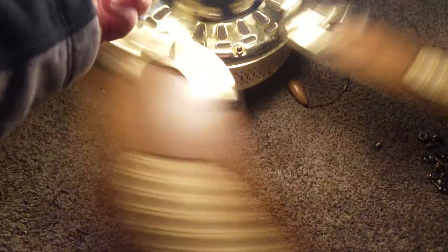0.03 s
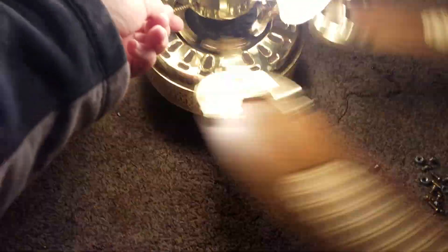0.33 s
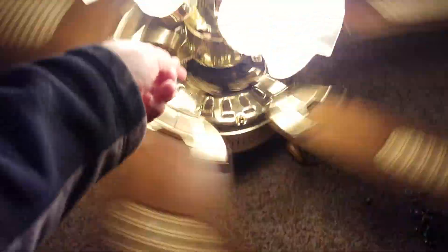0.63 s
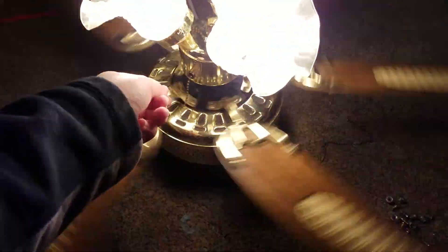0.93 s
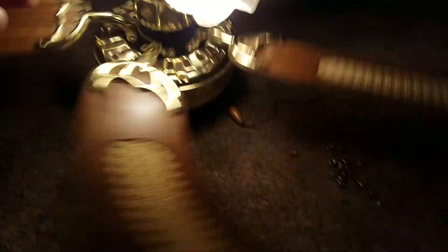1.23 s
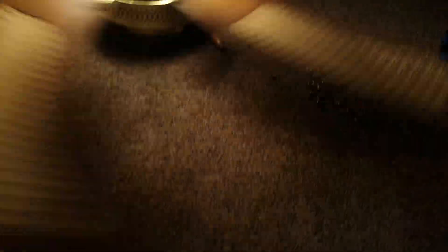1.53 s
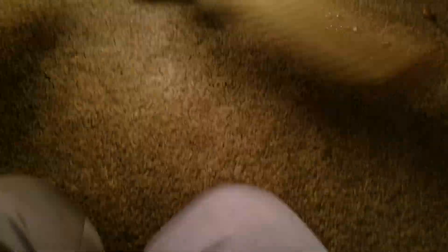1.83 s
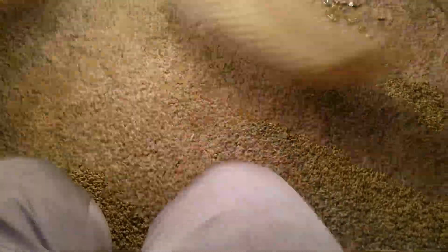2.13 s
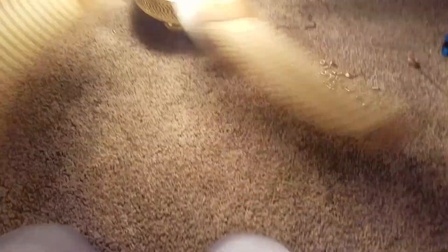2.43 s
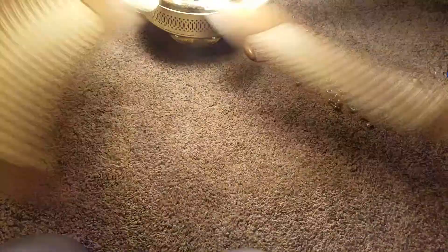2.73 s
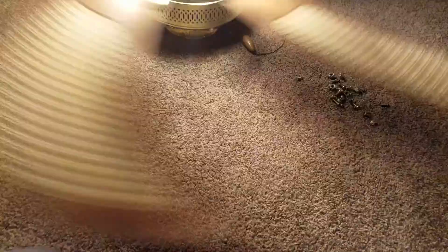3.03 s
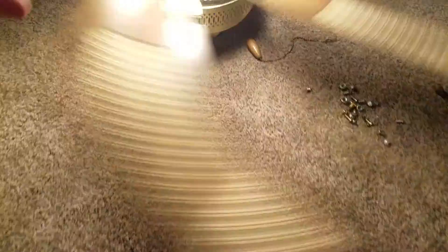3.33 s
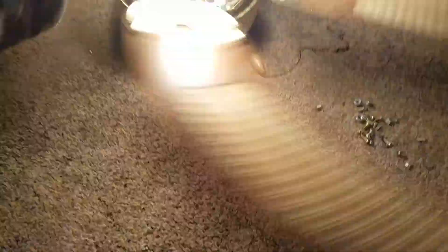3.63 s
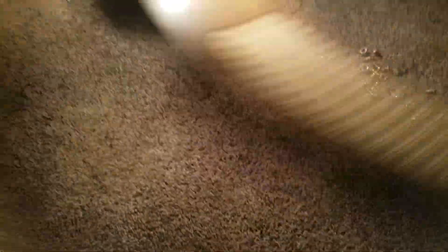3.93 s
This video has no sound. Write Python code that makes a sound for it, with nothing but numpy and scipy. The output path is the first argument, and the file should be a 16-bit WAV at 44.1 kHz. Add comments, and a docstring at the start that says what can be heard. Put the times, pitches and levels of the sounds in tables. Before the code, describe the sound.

Sharp, irregular metallic clicks and rattles from a turning ceiling fan over a faint hum.

```python
"""A ceiling fan just above a carpet in a small, well damped room, close to a stereo microphone. From the start
it gathers speed: the motor hums, its whine climbs and the blades stir the air. From about half a second small
loose metal parts strike the turning fan in sharp, bright, often doubled clicks, with fainter, duller taps
further off. Past two seconds the fan's housing takes two knocks; in the last second a soft rustle swells and
fades, and a loose fitting rings."""
import sys
import numpy as np
from scipy.fft import rfft, irfft, next_fast_len
from scipy.io import wavfile
from scipy.ndimage import map_coordinates

SR = 44100
rng = np.random.default_rng(int(sys.argv[2]) if len(sys.argv) > 2 else 0)


def generate_wav(sig):
    """Save sig (samples, or channels by samples) to the path in sys.argv[1] as 16-bit PCM at SR."""
    pcm = np.round(np.clip(np.atleast_2d(sig).T, -1, 1) * 32767).astype(np.int16)
    wavfile.write(sys.argv[1], SR, pcm)


N = 4 * SR

# How alike the two microphones hear air and impacts. Each row: frequency in Hz, left-right correlation.
AIR_LIKENESS = [(30, 0.88), (120, 0.67), (200, 0.98), (330, 0.8), (700, 0.4), (2000, 0.1), (8000, 0.042)]
IMPACT_LIKENESS = [(800, 0.5), (1500, 0.24), (3000, 0.056), (7000, -0.034), (15000, 0.027)]


def amp(db):
    """Decibels to gain."""
    return 10 ** (np.asarray(db) / 20)


def along(points, hz):
    """Read (Hz, value) points on a log frequency axis."""
    f, v = np.transpose(points)
    return np.interp(np.log(hz + 1), np.log(f + 1), v)


def wander(position, size=1024):
    """A smooth random curve with one knot per unit of position."""
    return map_coordinates(rng.standard_normal(size), [position], mode="mirror")


def noise(n, gain, likeness):
    """Stereo noise of rms 1 with a gain per frequency and a left-right likeness."""
    hz = np.fft.rfftfreq(n, 1 / SR)
    angle = np.arccos(np.clip(along(likeness, hz), -1, 1)) / 2
    spectrum = rfft(rng.standard_normal((2, n))) * gain(hz)
    mid, side = irfft(spectrum * [np.cos(angle), np.sin(angle)], n)
    stereo = np.array([mid + side, mid - side])
    return stereo / np.sqrt(np.mean(stereo ** 2) + 1e-20)


def air_noise(colour):
    """Steady noise of the given colour, nearly mono in the bass and wide in the treble."""
    return noise(N, lambda hz: amp(along(colour, hz)), AIR_LIKENESS)


def strike(t, rise, t60, hold=0):
    """A quick rise and an exponential decay that starts after the hold; times in seconds."""
    return (1 - np.exp(-t / rise)) * np.exp(-np.log(1000) * np.maximum(t - hold, 0) / t60)


def ring(t, modes, scatter_db):
    """Damped modes, blurred by reflections, reaching each microphone with their own phase."""
    mic_phase = 1.25 * np.array([[-.5], [.5]])  # radians
    sound = 0
    for hz, db, t60 in modes:
        envelope = amp(db + scatter_db * rng.normal()) * strike(t, rise=0.0019, t60=t60)
        phase = 2 * np.pi * (hz * t + rng.random())
        blur = 0.41 * wander(250 * t, size=128)
        sound += envelope * np.sin(phase + blur + mic_phase)
    return sound


def spot(hz):
    """Every struck spot has its own broad and fine resonances: a random curve in dB."""
    return 3.5 * (wander(hz / 330) + wander(hz / 70))


def add(out, start, sound):
    """Mix a sound in at a start time in seconds."""
    part = out[:, round(start * SR):][:, :sound.shape[-1]]
    part += sound[..., :part.shape[1]]


def air(t):
    """The rush of the blades grows with the speed, with a few low puffs of draught, over a faint hiss."""
    # Air stirred by the blades. Each row: time in seconds, relative level in dB.
    rush_levels = [(0.0, -64.5), (0.88, -62.5), (1.48, -58.5), (1.8, -60), (2.09, -60.5), (2.24, -59.5),
                   (3.34, -59), (4.0, -58)]
    # Puffs of draught. Each row: centre in seconds, width in seconds, level in dB.
    puffs = [(2.0, 0.094, -60.5), (3.67, 0.14, -72), (3.92, 0.11, -60.5)]
    # Spectra of the three noises. Each row: frequency in Hz, relative level in dB.
    rush_colour = [(15, -43), (28, -13), (60, -12), (90, -10.5), (170, -11), (250, -7), (300, -5),
                   (370, -2), (450, -8.5), (700, -12), (1000, -19.5), (1400, -19.5), (2500, -23),
                   (5000, -33.5), (8000, -36.5), (10000, -36.5), (13000, -32.5), (16000, -48)]
    puff_colour = [(25, -35), (70, 5.5), (180, 8.5), (320, 3), (700, 3), (2000, -77), (8000, -70)]
    hiss_colour = [(100, -1), (2000, -12), (6000, -4.5), (10000, -13), (13000, 0), (16000, -2)]
    rush_db = np.interp(t, *np.transpose(rush_levels)) - 0.5 + 1.5 * wander(12 * t)
    rush = amp(rush_db) * air_noise(rush_colour)
    swell = sum(amp(db) * np.exp(-.5 * ((t - centre) / width) ** 2) for centre, width, db in puffs)
    return rush + swell * air_noise(puff_colour) + amp(-73) * air_noise(hiss_colour)


def rustle(t):
    """A soft rustling hiss comes and goes near the end."""
    # Its swell. Each row: time in seconds, level in dB.
    levels = [(3.22, -90), (3.33, -65.5), (3.552, -58), (3.76, -59.5), (3.9, -66), (4, -86)]
    # Its spectrum. Each row: frequency in Hz, relative level in dB.
    colour = [(500, -2), (1500, 7.5), (3000, -8.5), (5000, 1), (6200, 0), (7200, 6), (8000, 6), (9000, -19),
              (11000, -7), (14000, -3), (16000, -8)]
    return amp(np.interp(t, *np.transpose(levels))) * air_noise(colour)


def motor(t):
    """The motor's whine climbs with its speed, over a slightly wavering hum."""
    # The whine. Each row: time in seconds, pitch in Hz, rms level in dB.
    whine_track = [(0, 322, -88), (0.499, 341, -76), (1.102, 357, -74.5), (1.302, 362, -61.5),
                   (1.649, 371, -62), (1.95, 376.6, -65.5), (2.15, 381.3, -58), (2.35, 384, -71.5),
                   (2.551, 386.3, -53), (2.781, 391.6, -70.5), (2.982, 390.2, -57), (3.15, 395, -72.5),
                   (3.38, 395.5, -61.5), (3.549, 399, -71.5), (4, 403.4, -64)]
    # Partials of the hum. Each row: frequency in Hz, rms level in dB.
    partials = [(120, -78.5), (240, -102), (360, -72.5), (476, -78), (596, -84.5)]
    times, hz, db = np.transpose(whine_track)
    phase = 2 * np.pi * np.cumsum(np.interp(t, times, hz)) / SR
    whine = amp(np.interp(t, times, db) + wander(14 * t)) * np.sin(phase)
    hum = sum(amp(level + 2 * wander(4 * t)) * np.sin(2 * np.pi * f * t + 0.27 * wander(5 * t))
              for f, level in partials)
    return np.sqrt(2) * (whine + hum)


def taps(t):
    """Dull taps further from the microphone, each a short burst of resonant noise."""
    # Each row: start in seconds, level in dB.
    hits = [(.989, -47.5), (1.107, -50.5), (1.229, -44.5), (1.722, -55), (2.23, -51), (2.51, -58),
            (2.605, -50.5), (2.626, -50), (2.71, -57.5), (2.991, -53.5), (3.276, -55)]
    # A tap's average spectrum. Each row: frequency in Hz, relative level in dB.
    colour = [(700, -20), (1300, 4), (1900, -1), (2350, 14.5), (2900, -6), (3500, -19), (7000, -9.5),
              (10000, -39), (13000, -6), (16000, -6)]
    out = np.zeros((2, N))
    for start, db in hits:
        tap = noise(t.size, lambda hz: amp(along(colour, hz) + spot(hz)), IMPACT_LIKENESS)
        add(out, start, amp(db) * strike(t, rise=0.00067, t60=0.14) * tap)
    return out


def ringing_parts(t):
    """The knocked housing and a loose fitting ring on in their modes; small pings sound one mode each."""
    # Blows to each part. Each row: start in seconds, strength in dB.
    housing_hits = [(2.282, -37.5), (2.443, -50)]
    fitting_hits = [(3.870, -41)]
    # Their modes. Each row: frequency in Hz, relative level in dB, t60 in seconds.
    housing_knock_modes = [(1116, -8.5, 0.26), (1150, -17, 0.043), (1274, -9, 0.09), (1343, -3, 0.088),
                           (1780, 4, 0.019), (1840, -15, 0.04), (2010, -17, 0.068), (2174, -8, 0.081),
                           (2480, 6.5, 0.078)]
    fitting_modes = [(2380, -0.5, 0.067), (2450, 1, .08), (2920, -1, 0.092), (4070, -24, 0.053),
                     (5385, -7, .1), (6310, 2, 0.12), (7280, -6, 0.16), (11900, 3, 0.11)]
    # Each row: start in seconds, frequency in Hz, level in dB, t60 in seconds.
    pings = [(.5342, 7770, -41.5, 0.0086), (1.158, 526, -43.5, 0.022), (1.436, 8050, -31, 0.059),
             (2.567, 6604, -39.5, 0.067), (3.142, 4600, -36.5, 0.08)]
    out = np.zeros((2, N))
    for hits, modes in (housing_hits, housing_knock_modes), (fitting_hits, fitting_modes):
        for start, db in hits:
            add(out, start, amp(db) * ring(t, modes, scatter_db=2.5))
    for start, *mode in pings:
        add(out, start, ring(t, [mode], scatter_db=0))
    return out


def clicks(t):
    """Metal strikes the fan close up: dense, quickly dying resonances, housing ring and room tail."""
    # Each row: start in seconds, then relative levels in dB of body, middle, treble and room tail.
    hits = [(.44, -63.5, -67, -72, -3), (.852, -54.5, -56, -58.5, -0.5), (0.9525, -48, -40, -27.5, 5.5),
            (1.079, -49.5, -46, -41, 7), (1.19, -46, -33, -26, 0.5), (1.203, -50, -36.5, -27, 2.5),
            (1.214, -44.5, -54, -37, -7), (1.3816, -47.5, -37.5, -27.5, 3), (1.386, -43, -53, -22.5, -2),
            (1.437, -43.5, -37.5, -30, 2), (1.549, -49.5, -47.5, -33.5, -1),
            (1.5548, -48.5, -39.5, -30, -1), (1.649, -55.5, -46, -37.5, 8.5),
            (1.788, -55.5, -49, -40, -1.5), (1.8494, -45, -35, -27.5, -3.5),
            (1.8545, -50, -40.5, -23.5, 1.5), (1.8967, -48, -39, -23.5, 0.5),
            (2.0125, -47.5, -45, -31, -12), (2.014, -54, -41, -35, 3.5), (2.1985, -59, -42.5, -27, 2),
            (2.2105, -56, -44, -50, 0), (2.2818, -37, -34.5, -23, 5.5), (2.4428, -41.5, -34, -26.5, 5),
            (2.4993, -52, -43.5, -39, 6.5), (2.567, -52.5, -35.5, -32.5, 6), (2.922, -64, -49, -42, -9),
            (2.9283, -52, -39, -26.5, 0), (2.943, -59, -39.5, -34, 1), (2.957, -51.5, -51, -38.5, 4),
            (3.115, -42, -44, -36, -14), (3.1188, -49, -39, -28, 6), (3.143, -55.5, -53, -37, 6),
            (3.224, -58, -46, -40, 0), (3.233, -49, -41, -29.5, 1.5), (3.392, -47, -37, -27, 3),
            (3.3956, -38, -35, -20.5, -4.5), (3.448, -39, -38.5, -31, 4), (3.6005, -47.5, -36.5, -29.5, 3),
            (3.608, -44, -37.5, -21.5, -2.5), (3.654, -44.5, -40.5, -35, 4), (3.8042, -47, -40, -31, 2),
            (3.8114, -41, -36, -27, 2.5), (3.87, -54.5, -42.5, -39.5, 5)]
    # Body, middle and treble. Each row: low and high edge in Hz, direct t60 in seconds,
    # relative room level in dB, room t60 in seconds, trim in dB.
    bands = [(850, 3500, 0.06, -5, 0.19, -4), (3450, 10400, 0.025, -9.5, 0.18, 1),
             (10660, 16500, 0.022, -14, 0.16, 1)]
    # A click's average spectrum. Each row: frequency in Hz, relative level in dB.
    average_colour = [(850, -29), (1150, -18), (1500, -22), (1800, -7.5), (2100, -18.5), (2400, -13.5),
                      (2800, -15.5), (3400, -13.5), (4200, -13.5), (5200, -14.5), (6500, -8.5),
                      (8000, -5.5), (9100, -13.5), (11000, -4.5), (11700, -4), (12500, 5), (14000, 1.5),
                      (15500, 4), (16300, -7)]
    # Modes of the metal housing. Each row: frequency in Hz, relative level in dB, t60 in seconds.
    housing_modes = [(1753, -8, 0.094), (1946, -7, 0.081), (2210, 4, 0.066), (2350, -3, 0.16),
                     (2440, -2, 0.27), (3090, -6, 0.24), (8130, 1, 0.11)]
    out = np.zeros((2, N))
    hz = np.fft.rfftfreq(t.size, 1 / SR)
    for start, *levels, tail_db in hits:
        colour = amp(along(average_colour, hz) + spot(hz))
        sound = amp(levels[0] - 13.5) * ring(t, housing_modes, scatter_db=5)  # rung lightly by the body
        for db, (low, high, t60, room_db, room_t60, trim_db) in zip(levels, bands):
            # The hold: the part chatters briefly before it lets go.
            direct = amp(3) * strike(t, rise=0.00082, t60=t60, hold=0.0016)
            room = amp(room_db + tail_db) * strike(t, rise=0.0027, t60=room_t60)
            band = noise(t.size, lambda f: colour * (f > low) * (f < high), IMPACT_LIKENESS)
            sound += amp(db + trim_db) * np.hypot(direct, room) * band
        add(out, start, sound)
    return out


def scene():
    """The running fan and everything that strikes it."""
    t = np.arange(N) / SR
    hit_t = t[:12288]  # time for one impact to die away
    return clicks(hit_t) + taps(hit_t) + ringing_parts(hit_t) + motor(t) + air(t) + rustle(t)


def record(dry):
    """The recorder cuts off steeply at its band limit."""
    limit_hz, edge_hz = 16050, 110
    size = next_fast_len(N + SR // 2)
    gain = 1 / (1 + np.exp((np.fft.rfftfreq(size, 1 / SR) - limit_hz) / edge_hz))
    return irfft(rfft(dry, size) * gain, size)[:, :N]


dry = scene()
out = record(dry)
generate_wav(out)
```